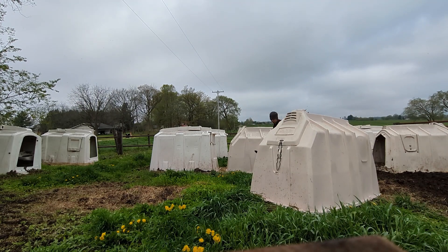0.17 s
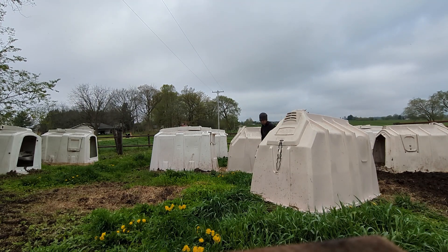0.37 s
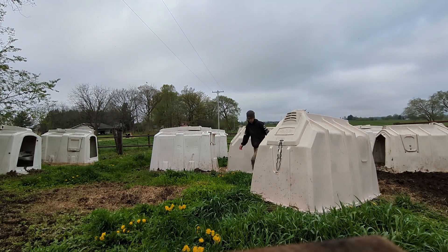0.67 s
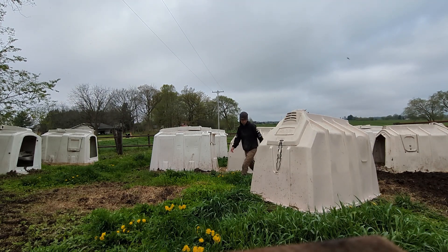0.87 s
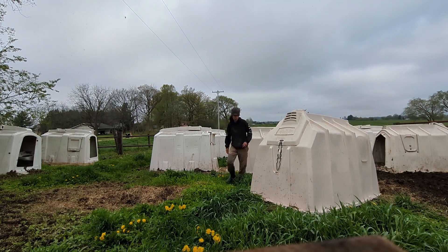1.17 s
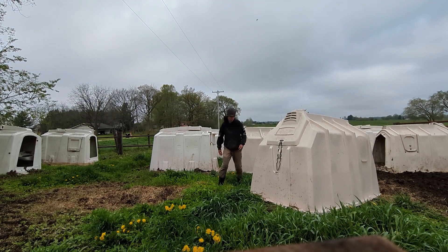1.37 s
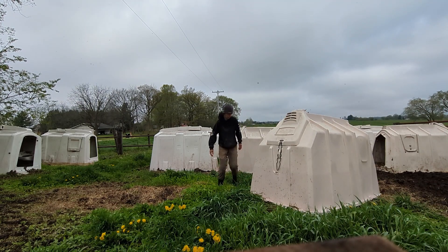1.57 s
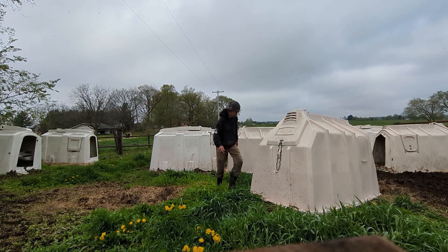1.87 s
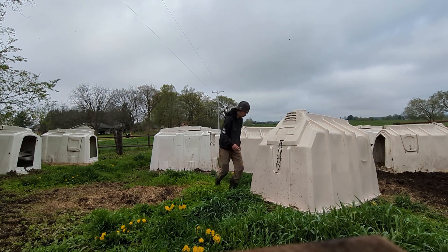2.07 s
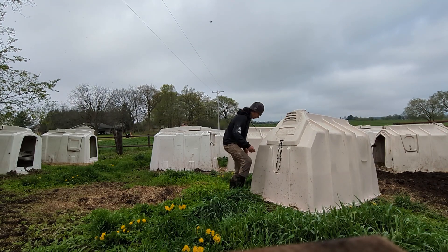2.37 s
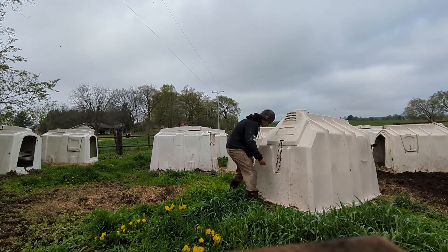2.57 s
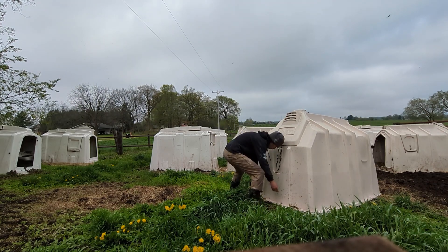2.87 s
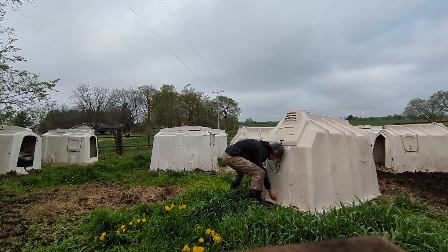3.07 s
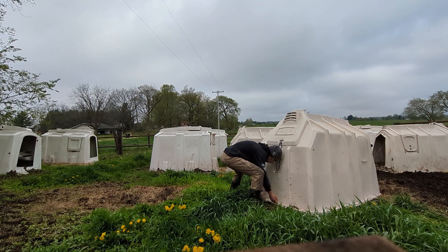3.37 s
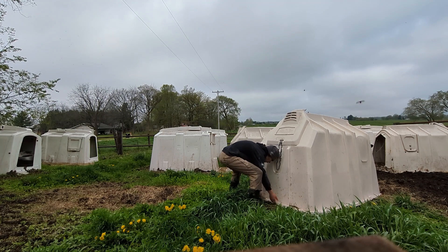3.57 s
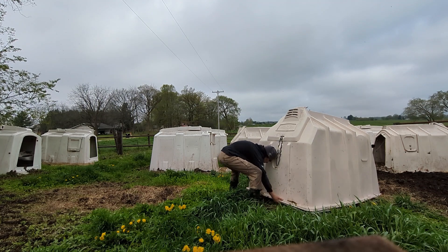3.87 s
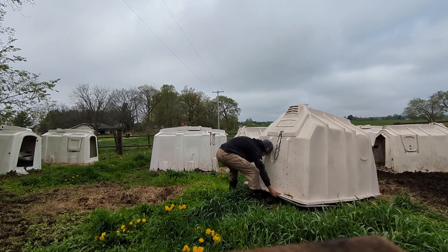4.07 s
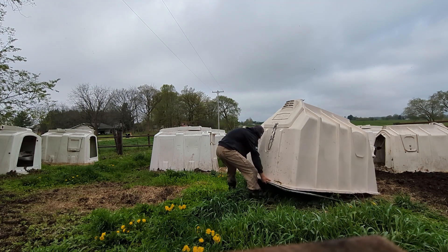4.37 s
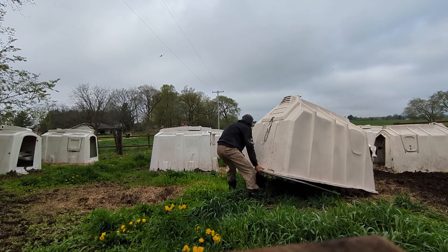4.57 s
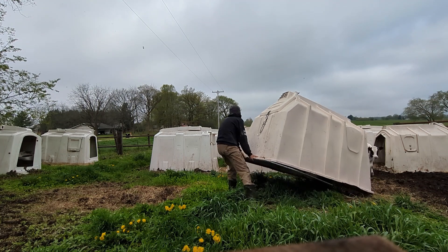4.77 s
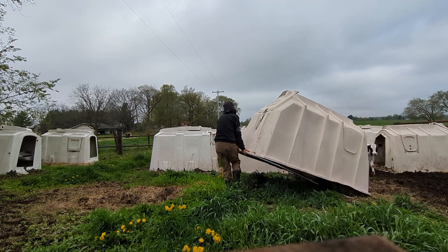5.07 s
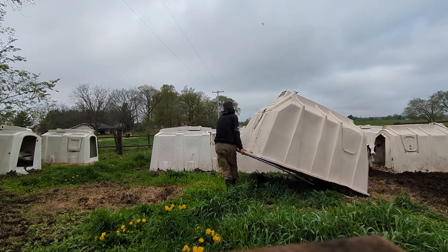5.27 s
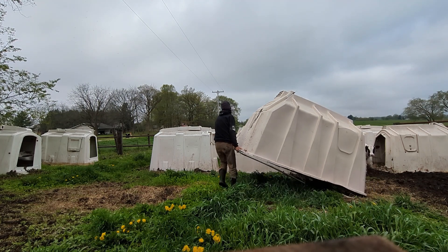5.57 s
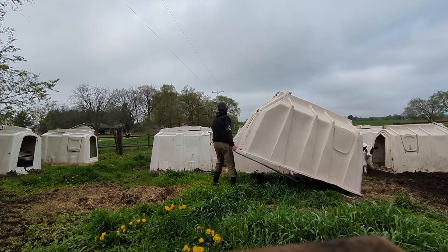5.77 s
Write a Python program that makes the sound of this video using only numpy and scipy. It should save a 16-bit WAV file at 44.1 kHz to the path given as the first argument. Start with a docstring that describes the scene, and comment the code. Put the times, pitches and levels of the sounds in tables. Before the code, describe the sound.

An open, dry farmyard heard in close stereo, with a faint steady bed of low wind rumble and leafy hiss. From 0 to 2 s a large hollow plastic hutch is handled roughly: knocks near 0.1 and 0.2 s, the deepest booming thud at about 0.7 s, and another hard, clacky knock at 1.3 s, followed by lighter ones. Wobbling walls, gritty rim scraping and brushing grass and cloth fill the gaps, with short bird whistles. From 2 to 4.3 s it is quieter: a soft swish near 2.5 s, sharp clicks just before 3 s, faint taps and creaks, and clear sliding whistles around 3.5-3.8 s and 4.2 s. At 4.4 s the shell lifts with low flexing booms and creaky bumps, then a rapid flurry of rattly knocks and scraping near 5 s. Six tiny high falling chips run from 5.4 s, with a final low wobble and light scrape.

```python
"""A large hollow plastic hutch is set down, knocked and tipped up on a grassy farmyard, heard at two mic ports.
Throughout: low outdoor rumble and hiss (shaped noise), wall wobble and rim scrape, songbird whistles (sines).
0-2 s: most knocks (ringing modes, resonant chatter), wall booms (sagging sines), grass and cloth swishes (grains).
2-4.3 s: quieter; slow swishes, a few sharp clicks, soft knocks and creaks, whistles. From 4.4 s: more booms,
a flurry of knocks near 5 s, then six falling bird chips and a last wobble and scrape."""
import sys
import numpy as np
from scipy import signal
from scipy.fft import rfft, irfft, next_fast_len
from scipy.io import wavfile
from scipy.ndimage import uniform_filter1d

SR = 44100
rng = np.random.default_rng(int(sys.argv[2]) if len(sys.argv) > 2 else 0)


def output_pcm(signal):
    """Save a mono or channel-first signal as 16-bit PCM at the path in sys.argv[1].

    Samples are clipped to [-1, 1] before scaling.
    """
    pcm = np.clip(np.atleast_2d(signal).T, -1, 1) * 32767
    wavfile.write(sys.argv[1], SR, np.round(pcm).astype(np.int16))


def voltage_ratio(level):
    """Linear amplitude factor for a level in decibels (scalar or array-like)."""
    return 10 ** (np.asarray(level, float) / 20)


N = 261513
PADDED = next_fast_len(N + SR // 10)
BIN_HZ = np.maximum(np.fft.rfftfreq(PADDED, 1 / SR), 1)


def unit(x):
    """Scale to rms 1."""
    return x / np.sqrt(np.mean(x ** 2))


def colour(x, spectrum):
    """Shape by (Hz, dB) points on a log frequency axis; rms 1."""
    hz, db = np.transpose(spectrum)
    gain = voltage_ratio(np.interp(np.log(BIN_HZ), np.log(hz), db))
    return unit(irfft(rfft(x, PADDED) * gain, PADDED))


def walk(steps_per_s):
    """Random levels, held one step and slewed twice; spread near 1."""
    hold = int(SR / steps_per_s)
    held = np.repeat(rng.standard_normal(N // hold + 1), hold)
    return 1.3 * uniform_filter1d(uniform_filter1d(held, hold), hold)[:N]


def add(out, start_s, sound):
    """Mix a sound into out at start_s."""
    i = int(start_s * SR)
    out[..., i:i + sound.shape[-1]] += sound[..., :N - i]


def fade(t, t60_s, rise_s):
    """Rise over rise_s, decay by 60 dB in t60_s."""
    return (1 - np.exp(-(t / rise_s) ** 2)) * np.exp(-np.log(1000) * t / t60_s)


def grit(spread_db):
    """Noise of uneven grains, rms 1."""
    grain_db = spread_db * np.minimum(rng.exponential(size=PADDED), 2)
    return unit(rng.standard_normal(PADDED) * voltage_ratio(grain_db))


def ports(make, lag_ms, alike_hz, pan_db):
    """The right port hears it later; above alike_hz echoes make the two sides unrelated."""
    direct, scattered = rfft(make(), PADDED), rfft(make(), PADDED)
    alike = 1 / (1 + (BIN_HZ / alike_hz) ** 2)
    delayed = direct * np.exp(-2j * np.pi * BIN_HZ * lag_ms / 1000)
    right = np.sqrt(alike) * delayed + np.sqrt(1 - alike) * scattered
    return np.array([irfft(direct, PADDED)[:N] * voltage_ratio(pan_db / 2),
                     irfft(right, PADDED)[:N] * voltage_ratio(-pan_db / 2)])


# yard noise spectrum: freq_hz, density_db (relative, per Hz)
YARD_SPECTRUM = [(25, -69), (53, -40), (84, 10), (145, 1.5), (363, -51), (840, -27.5), (1100, -17),
                 (3620, -25.5), (7000, -29.5), (13800, -44)]
YARD_DB = -59


def yard():
    """Far leaves and wind: a nearly steady bed of low rumble and hiss as shaped noise."""
    noise = ports(lambda: colour(rng.standard_normal(PADDED), YARD_SPECTRUM), 0.032, 330, 0.75)
    return noise * voltage_ratio(YARD_DB + 0.134 * walk(0.23))


# level breakpoints, interpolated: time_s, wobble_db, scrape_db
HANDLING_LEVELS = [(0, -38, -41.5), (.3, -30.5, -39.5), (0.498, -41, -53.5), (1.0, -42, -48),
                   (1.25, -44.5, -58), (1.45, -39, -49), (1.92, -52, -61), (2.15, -54, -70.5),
                   (4.35, -48.5, -72.5), (4.55, -40.5, -60.5), (5.03, -40, -40), (5.2, -37, -55.5),
                   (5.3, -48, -66), (5.398, -47.5, -60.5), (5.8, -52, -61), (5.93, -38.5, -55.5)]
# wall wobble spectrum: freq_hz, density_db (relative, per Hz)
WOBBLE_SPECTRUM = [(30, -77), (55, 2.5), (100, -5.5), (150, -9.5), (400, -56)]
# rim scrape spectrum: freq_hz, density_db (relative, per Hz)
SCRAPE_SPECTRUM = [(120, -4), (220, 3.5), (500, -5.5), (1000, -11), (3400, -22), (5000, -38)]


def handling():
    """Walls wobble as low noise; the rim scrapes in jerks as gritty noise."""
    time_s, *columns = np.transpose(HANDLING_LEVELS)
    wobble_db, scrape_db = (np.interp(np.arange(N) / SR, time_s, c) for c in columns)
    wobble = ports(lambda: colour(rng.standard_normal(PADDED), WOBBLE_SPECTRUM), 0.077, 280, 0.076)
    scrape = ports(lambda: colour(grit(2.5), SCRAPE_SPECTRUM), 0.3, 900, 1.5)
    jerks_db = 3.5 * walk(120)
    return wobble * voltage_ratio(wobble_db + 0.96 * walk(13)) + scrape * voltage_ratio(scrape_db + jerks_db)


# whistles that slide and settle: start_s, length_s, first_hz, last_hz, level_db
SLIDES = [(0.422, 0.028, 2950, 2200, -51), (0.668, 0.07, 2950, 2000, -52), (2.12, .05, 2300, 2000, -67),
          (3.478, 0.035, 4150, 3100, -60), (3.593, 0.095, 3150, 2060, -50),
          (3.71, 0.055, 2980, 2200, -51.5), (3.803, .045, 2850, 2150, -52), (4.172, .024, 3050, 1850, -59),
          (4.226, .06, 2754, 3200, -52), (5.682, .06, 2900, 2420, -66), (4.812, 0.088, 3100, 2000, -53),
          (4.98, .035, 7400, 5700, -58)]
SETTLE = 2.2  # exponent: how early the slide levels off (1 = straight)
# whistles that bend away and return: start_s, length_s, resting_hz, turning_hz, level_db
BENDS = [(.02, .04, 2450, 2150, -53.5), (.445, .035, 2250, 2520, -54), (0.768, .056, 1980, 2480, -52),
         (3.762, .05, 2350, 2750, -51), (4.203, 0.078, 2920, 2575, -49.5), (4.318, 0.12, 2420, 2080, -51),
         (4.352, 0.075, 2650, 3260, -55.5), (5.19, .065, 2950, 3550, -60)]
# whistles on one pitch: start_s, length_s, pitch_hz, level_db
HELD = [(.11, .065, 2150, -54), (.595, .04, 2220, -57), (.64, .028, 2720, -55), (.828, .055, 2220, -55),
        (1.078, .035, 10300, -62), (1.91, .055, 2820, -68), (2.15, .04, 3720, -71),
        (4.139, 0.076, 5960, -64), (4.581, 0.096, 5800, -65), (5.665, .05, 3500, -66),
        (5.85, .05, 2410, -62)]
CHIP_START_S, CHIP_GAP_S, CHIP_DB = 5.358, 0.107, -63


def birds():
    """Near-sine whistles that slide, bend or hold, falling chips, and a blur of echoes from the sheds."""
    chips = [(CHIP_START_S + k * CHIP_GAP_S, 0.016, 6900, 5600, CHIP_DB) for k in range(6)]
    held = [(start_s, length_s, hz, hz, db) for start_s, length_s, hz, db in HELD]
    song, waver = np.zeros(N), 1 + 0.008 * walk(120)

    def slide(u):
        return 1 - (1 - u) ** SETTLE

    def bend(u):
        return 4 * u * (1 - u)

    for notes, path in ((SLIDES + held + chips, slide), (BENDS, bend)):
        for start_s, length_s, first_hz, other_hz, level_db in notes:
            u = np.linspace(0, 1, int(length_s * SR))
            i = int(start_s * SR)
            hz = (first_hz + (other_hz - first_hz) * path(u)) * waver[i:i + len(u)]
            whistle = np.sin(2 * np.pi * np.cumsum(hz) / SR)
            add(song, start_s, voltage_ratio(level_db) * np.sin(np.pi * u) ** 0.089 * whistle)
    song = song * voltage_ratio(2 * walk(90))
    t = np.arange(SR // 2) / SR
    echo = []
    for _ in "LR":
        blur = unit(rng.standard_normal(len(t))) * fade(t, 0.79, 0.0024)
        echo.append(signal.fftconvolve(song, blur)[:N])
    return ports(lambda: song, 0.1, 6400, 3.3) + voltage_ratio(-39.5) * np.array(echo)


# swishes of grass and cloth, and a few sharp clicks (shortest rises): start_s, level_db, rise_s
SWISHES_AND_CLICKS = [(0.058, -47, 0.0018), (0.178, -50.5, 0.035), (0.209, -43, 0.022),
                      (0.308, -43.5, 0.00059), (0.837, -47.5, 0.026), (0.993, -49, 0.0015),
                      (1.185, -57, 0.019), (1.308, -52.5, 0.036), (1.397, -50, 0.015), (1.838, -58.5, 0.03),
                      (2.05, -66, 0.048), (2.245, -60, 0.06), (2.365, -56, 0.0016), (2.46, -43.5, 0.05),
                      (2.561, -56.5, 0.17), (2.968, -40.5, 0.00012), (2.988, -53.5, 0.00027),
                      (4.701, -56, 1), (5.068, -52.5, 0.14), (5.685, -57, 0.11)]
# grain spectrum: freq_hz, density_db (relative, per Hz)
GRAIN_SPECTRUM = [(600, -27), (1100, 1), (4000, 3.5), (11500, -0.5), (15500, -2.5)]
T60_PER_ROOT_RISE = 1.095  # t60_s = this * sqrt(rise_s): slow bursts die slowly


def swishes_and_clicks():
    """Bursts of fine noise grains: slow rises swish like grass and cloth, the fastest click."""
    t, strength = np.arange(SR) / SR, np.zeros(N)
    for start_s, level_db, rise_s in SWISHES_AND_CLICKS:
        burst = fade(t, T60_PER_ROOT_RISE * np.sqrt(rise_s), rise_s)
        add(strength, start_s, voltage_ratio(level_db) * burst / burst.max())
    grains = ports(lambda: colour(grit(2.2), GRAIN_SPECTRUM), 0.12, 4000, 2.5)
    return grains * strength * voltage_ratio(2 * walk(150))


def peak(x, hz, width_hz):
    """One resonance."""
    return signal.lfilter(*signal.iirpeak(hz, hz / width_hz, SR), x)


def clack(push, resonances):
    """Short stiff shell resonances; the jolts catch now one, now another."""
    out = np.zeros(N)
    for hz, width_hz, level_db in resonances:
        ring = push * voltage_ratio(4 * walk(250))
        for widening in (1, 3, 2):
            ring = peak(ring, hz, widening * width_hz)
        out += voltage_ratio(level_db) * ring
    return out


# knocks on the shell: start_s, clack_drive_db, rib_over_clack_db, body_db
KNOCKS = [(0.074, -25, -13.5, -22), (0.175, -21.5, -4.5, -25.5), (0.31, -37.5, -3.5, -42),
          (0.662, -20, -50, -14), (0.956, -41.5, -5.5, -35), (1.284, -16, -11.5, -21),
          (1.403, -28.5, -31, -29.5), (1.744, -33.5, -15, -37), (1.844, -33, -16, -38.5),
          (2.821, -46, -3.5, -44), (4.4, -44.5, -10, -29), (4.923, -27, -7, -38), (4.97, -28.5, -2, -39),
          (5.017, -24, -1, -35), (5.048, -30.5, -1.5, -38.5)]
# soft knocks, creaks and short scrapes on the shell: start_s, drive_db, rib_over_drive_db
SOFT_CONTACTS = [(0.217, -18.5, -12), (0.389, -27, -15.5), (0.531, -27, -1.5), (0.56, -29.5, 0),
                 (1.392, -30.5, -10.5), (1.528, -47, -4.5), (1.597, -42, -8), (1.626, -36, -12),
                 (1.708, -44, -8.5), (2.033, -44, -12), (3.036, -40, -32), (3.139, -50, -8),
                 (3.563, -38.5, -5.5), (3.854, -49.5, 1.5), (4.11, -43, -9.5), (4.481, -30.5, -17.5),
                 (4.627, -32, -11), (4.7, -32.5, -10.5), (4.772, -27.5, -5.5), (4.852, -35.5, -1.5),
                 (5.495, -46, -5.5)]
# shell modes: nominal_hz, level_db (before blow tilt and spread), ring_share (times BASE_T60_S)
SHELL_MODES = [(161, -0.5, 1.36), (211.5, 4.5, 0.86), (330.7, -8.5, 1), (421.2, -10, 0.74), (537, -9, 0.66)]
# dull clack of broad panels: freq_hz, width_hz, level_db
PANELS = [(710, 463, 0.5), (1034, 368, 1.5)]
# bright clack of ribs and edges: freq_hz, width_hz, level_db
RIBS = [(1850, 675, 1), (3350, 610, -4)]
BASE_T60_S, CHATTER_S, SOFT_RISE_S = 0.26, 0.033, 0.0026
SNAP_DB = -8  # relative to the rib drive


def knocks():
    """Blows ring detuned shell modes; noise chatter, also from soft contacts, drives the clack resonances."""
    t = np.arange(SR // 2) / SR
    body, dull, bright, snap, sharp = np.zeros((5, N))
    tick = 3.5 * fade(t, 0.02, 0.0004)
    crack = 1.2 * fade(t, 0.02, 0.001)
    chatter_fall = np.exp(-(t / CHATTER_S) ** 2)
    contact = crack + chatter_fall * np.minimum(t / 0.0072, 1) + 0.24 * fade(t, 0.4, 0.083)
    # the flexing wall keeps detuning its modes: rough ring
    detune = 1 + 0.07 * np.array([walk(60) for _ in SHELL_MODES])
    chances = rng.standard_normal((len(KNOCKS), len(SHELL_MODES)))
    for (start_s, clack_db, rib_db, body_db), chance in zip(KNOCKS, chances):
        # a soft blow (little clack) starves the upper modes
        tilt_db = 0.73 * (clack_db - body_db + 6.5)  # per octave
        gain = voltage_ratio([db + 1.7 * c + tilt_db * np.log2(hz / SHELL_MODES[1][0])
                    for (hz, db, _), c in zip(SHELL_MODES, chance)])
        i = int(start_s * SR)
        ring = np.zeros(len(t))
        for (hz, _, share), g, c, drift in zip(SHELL_MODES, gain, chance[::-1], detune):
            blow_hz = hz * (1 + 0.0576 * c)  # each blow bends the wall its own way
            phase = 2 * np.pi * blow_hz * np.cumsum(drift[i:i + len(t)]) / SR
            # low modes take longer to build up
            ring += g * fade(t, BASE_T60_S * share, 0.64 / hz) * np.sin(phase)
        add(body, start_s, voltage_ratio(body_db) * ring / np.linalg.norm(gain))
        add(dull, start_s, voltage_ratio(clack_db) * contact)
        add(bright, start_s, voltage_ratio(clack_db + rib_db) * contact)
        add(sharp, start_s, voltage_ratio(clack_db + rib_db) * tick)
        add(snap, start_s, voltage_ratio(clack_db + rib_db + SNAP_DB) * fade(t, 0.013, 0.000097))
    soft = (1 - np.exp(-t / SOFT_RISE_S)) * chatter_fall
    for start_s, drive_db, rib_db in SOFT_CONTACTS:
        add(dull, start_s, voltage_ratio(drive_db) * soft)
        add(bright, start_s, voltage_ratio(drive_db + rib_db) * soft)
        add(sharp, start_s, voltage_ratio(drive_db + rib_db) * tick / 2)  # light first touch
    edge = sharp * rng.standard_normal(N)  # the first touch cracks on the ribs

    def chatter():
        jolts = grit(6)[:N]
        panels = clack(dull * jolts, PANELS)
        ribs = clack(bright * jolts[::-1] + edge, RIBS)
        return panels + ribs + snap * rng.standard_normal(N)

    return ports(lambda: body, 0.22, 10000, 0.31) + ports(chatter, 0.38, 1300, 2.5)


# whole wall flexing like a drum skin: start_s, level_db, pitch_hz (at the start)
BOOMS = [(0.08, -21.5, 95.8), (0.671, -14, 102.5), (0.717, -24, 67), (0.813, -30.5, 61), (1.162, -33, 74.6),
         (1.303, -28.5, 119), (4.414, -26.5, 69.7), (4.504, -33, 81.6), (4.676, -30, 95.4),
         (5.151, -35, 117), (5.226, -36, 87.7)]
SWING_S = 0.052  # fall to 1/e


def booms():
    """A wall swings a few cycles, pitch sagging, until the ground or a hand damps it."""
    t, out = np.arange(SR // 2) / SR, np.zeros((2, N))
    for (start_s, level_db, hz), side in zip(BOOMS, rng.standard_normal(len(BOOMS))):
        swing = (1 - np.exp(-(t * hz / 0.28) ** 2)) * np.exp(-(t / SWING_S) ** 2.04)
        # different walls face the two ports differently
        port_rad = np.array([[1], [-1]]) * (0.067 + 0.046 * side)
        phase = 2 * np.pi * hz * (t - 0.038 * t ** 2) + port_rad
        add(out, start_s, voltage_ratio(level_db) * swing * np.sin(phase))
    return out


def scene():
    """Sum of all sources."""
    return yard() + handling() + birds() + swishes_and_clicks() + knocks() + booms()


def roll_off(x):
    """The treble ends steeply here."""
    return signal.sosfilt(signal.butter(12, 16450, fs=SR, output="sos"), x)


def record(dry):
    """Cut the lowest bass (42 Hz) and the top (15.4 kHz)."""
    low_cut = signal.butter(3, 42, "high", fs=SR, output="sos")
    top_cut = signal.ellip(8, 0.5, 60, 15400, fs=SR, output="sos")
    mix = signal.sosfilt(top_cut, signal.sosfilt(low_cut, dry))
    return roll_off(mix)


dry = scene()
out = record(dry)
output_pcm(out)
```